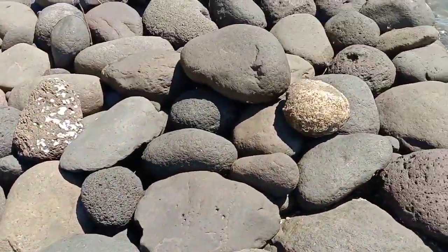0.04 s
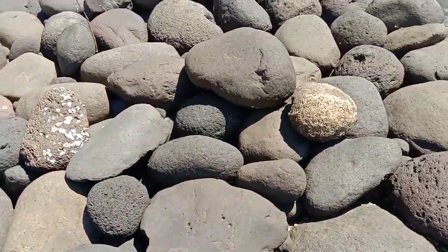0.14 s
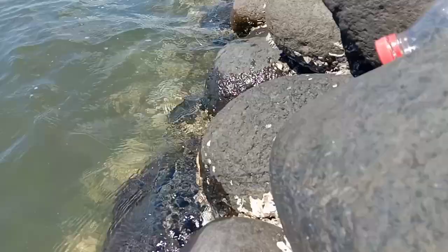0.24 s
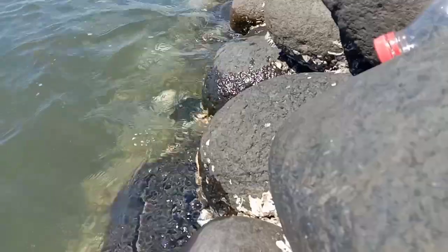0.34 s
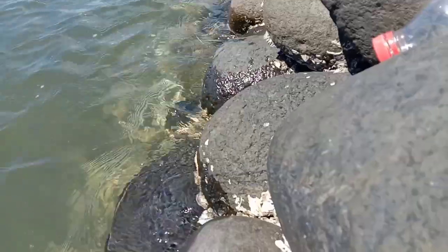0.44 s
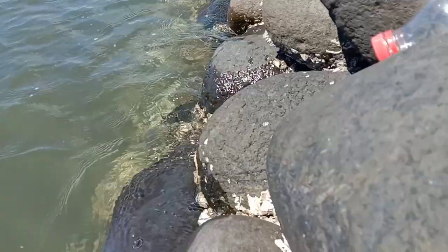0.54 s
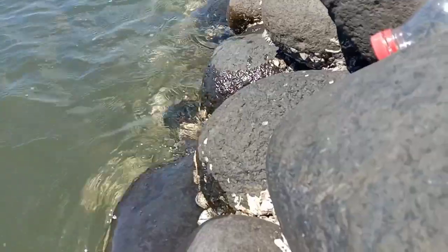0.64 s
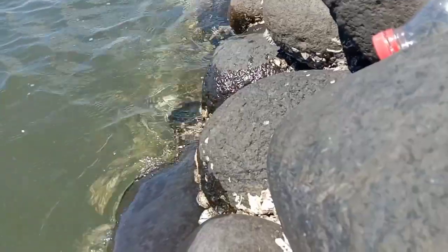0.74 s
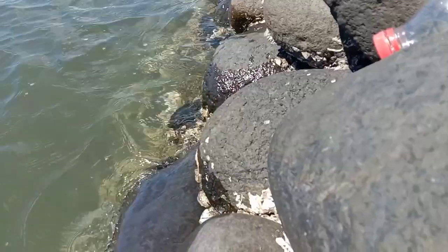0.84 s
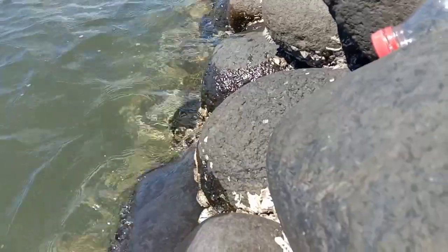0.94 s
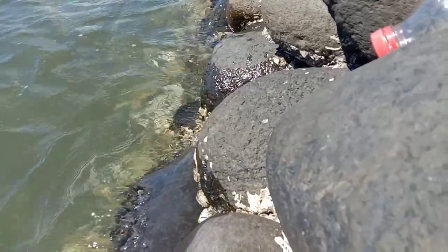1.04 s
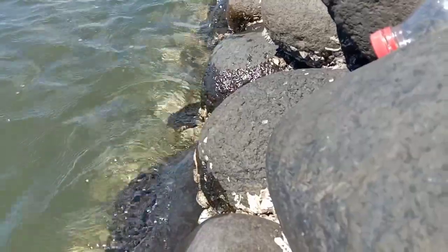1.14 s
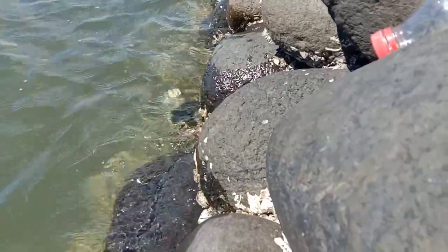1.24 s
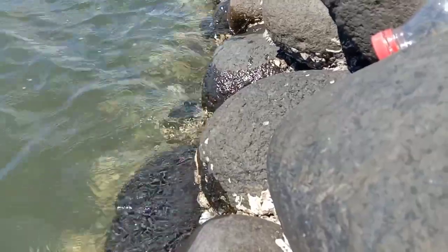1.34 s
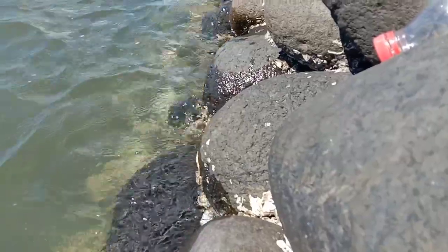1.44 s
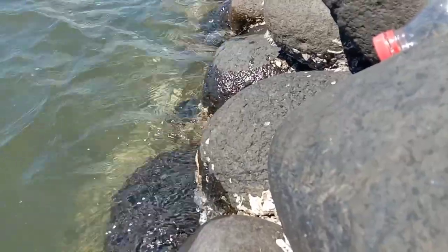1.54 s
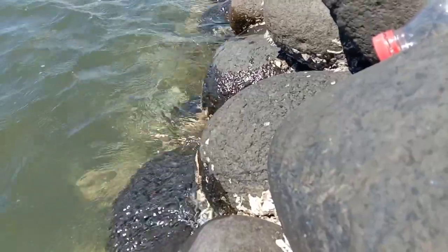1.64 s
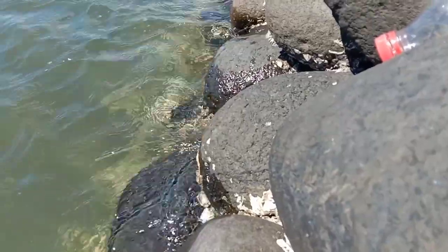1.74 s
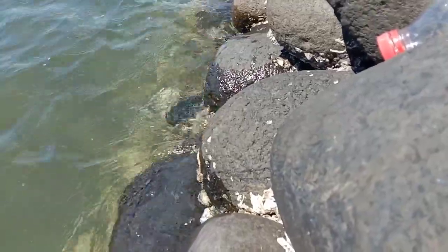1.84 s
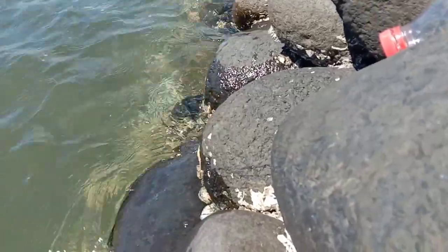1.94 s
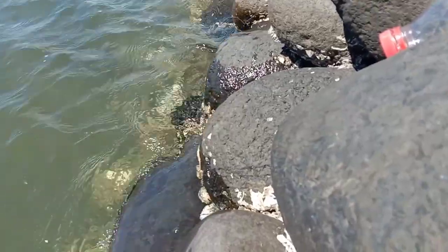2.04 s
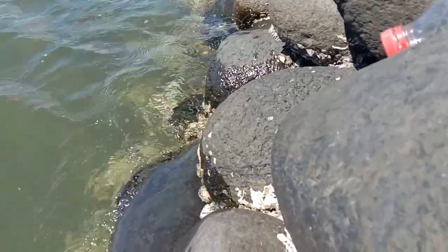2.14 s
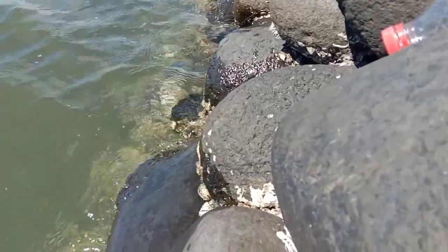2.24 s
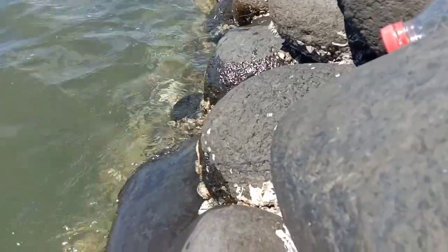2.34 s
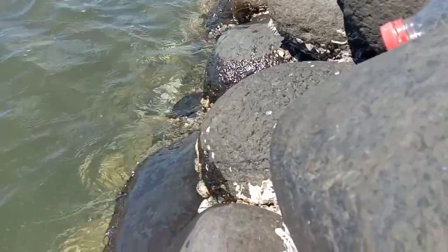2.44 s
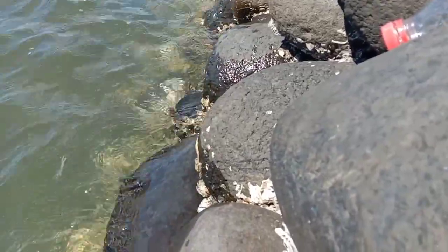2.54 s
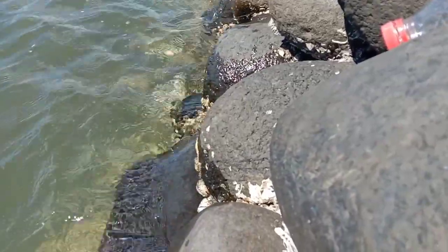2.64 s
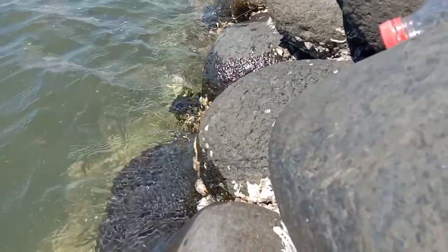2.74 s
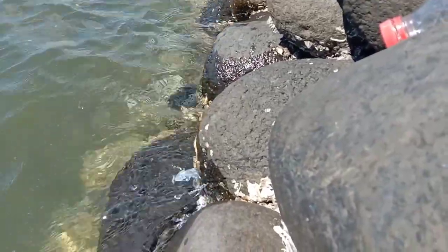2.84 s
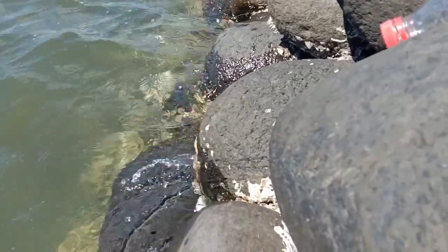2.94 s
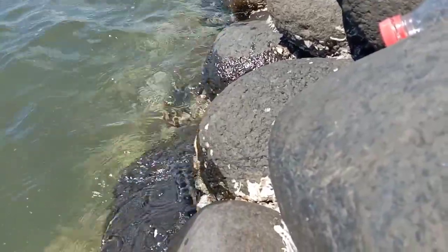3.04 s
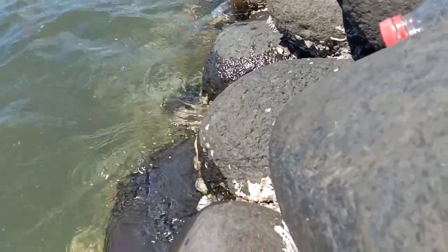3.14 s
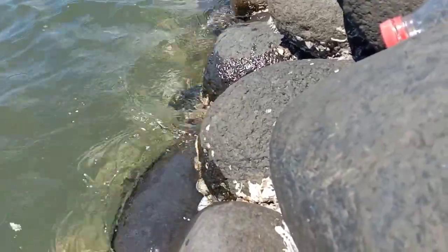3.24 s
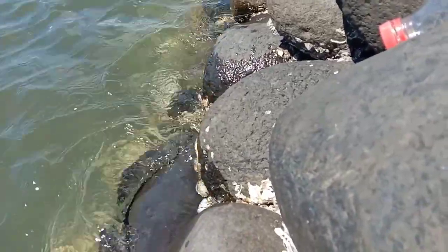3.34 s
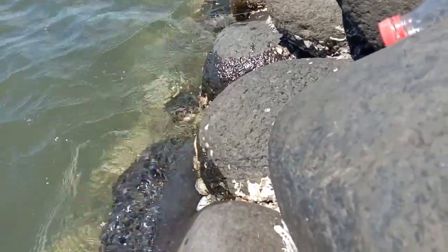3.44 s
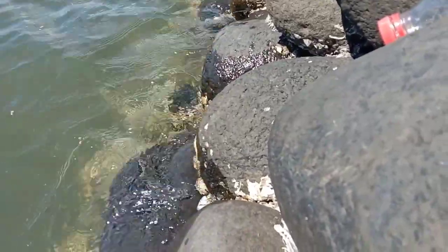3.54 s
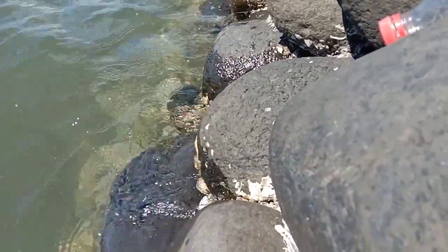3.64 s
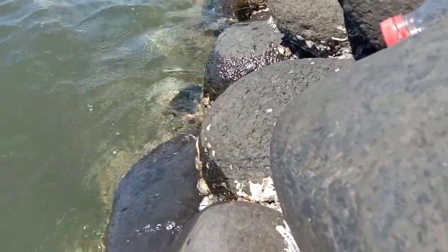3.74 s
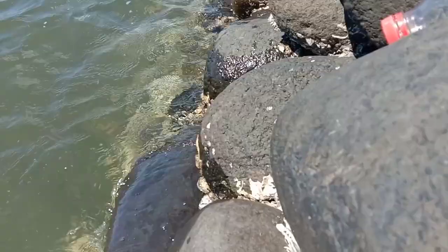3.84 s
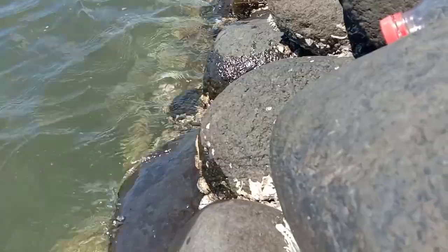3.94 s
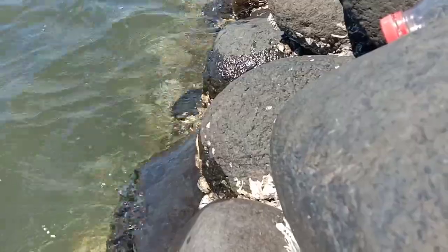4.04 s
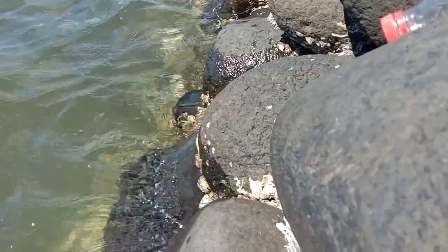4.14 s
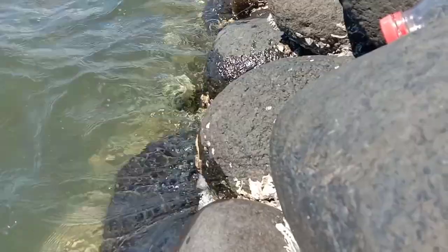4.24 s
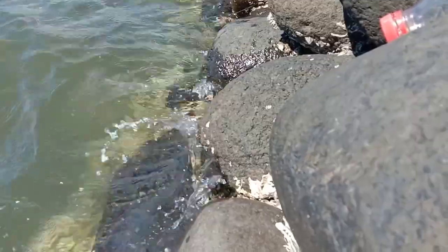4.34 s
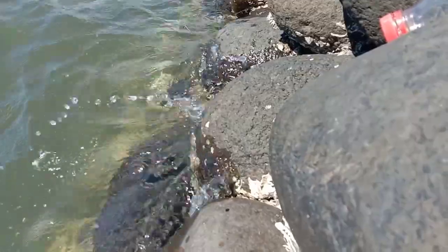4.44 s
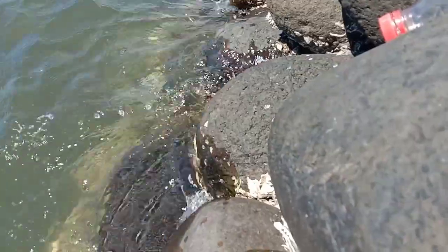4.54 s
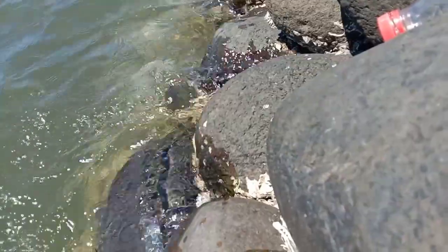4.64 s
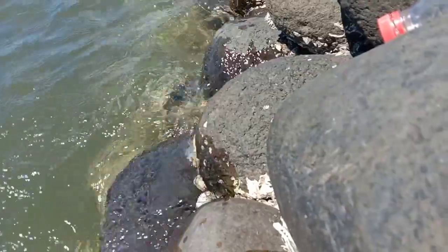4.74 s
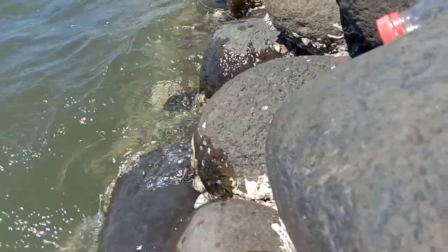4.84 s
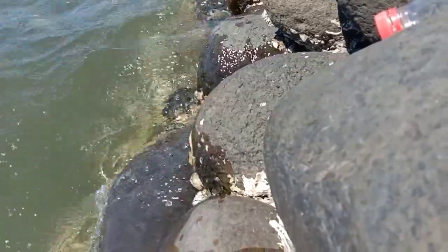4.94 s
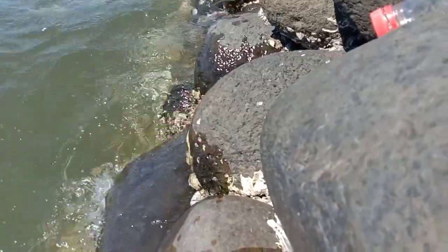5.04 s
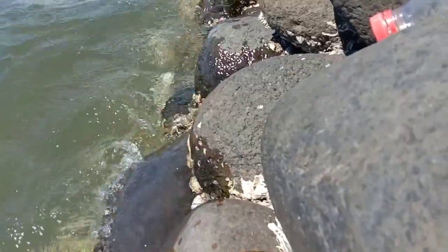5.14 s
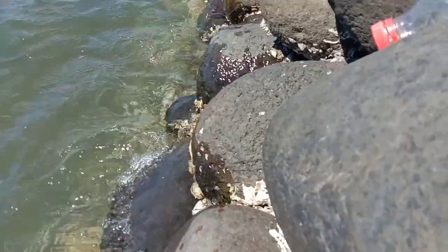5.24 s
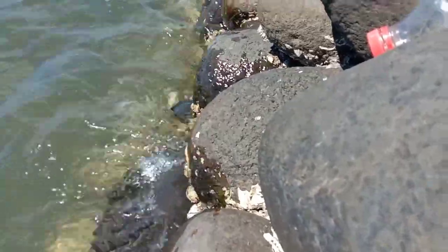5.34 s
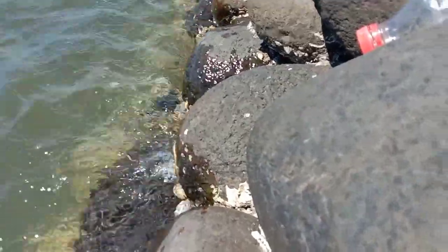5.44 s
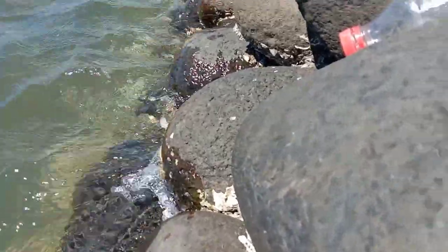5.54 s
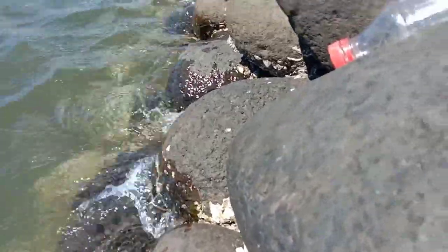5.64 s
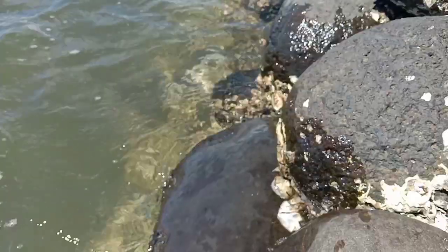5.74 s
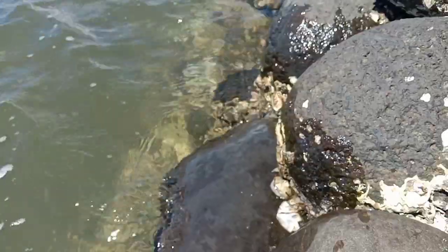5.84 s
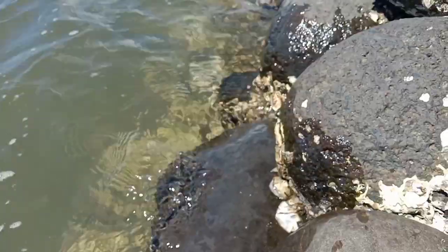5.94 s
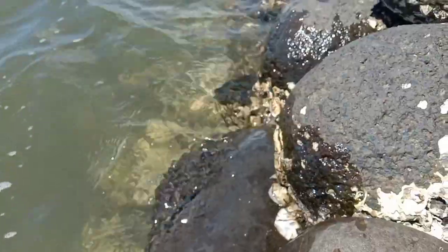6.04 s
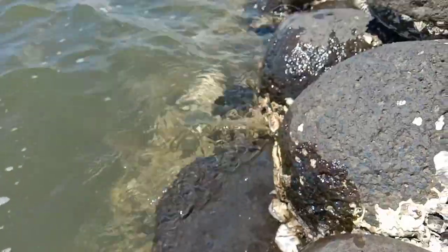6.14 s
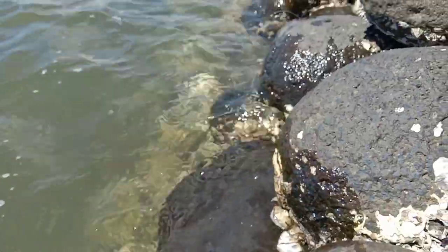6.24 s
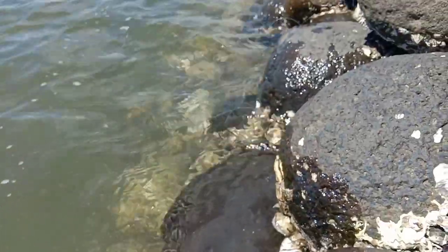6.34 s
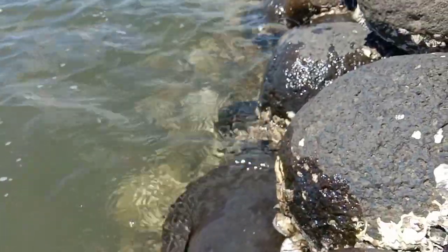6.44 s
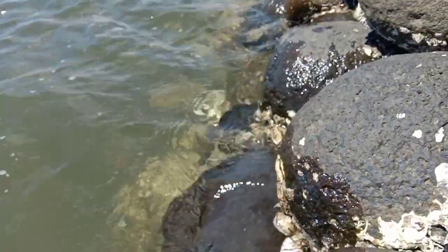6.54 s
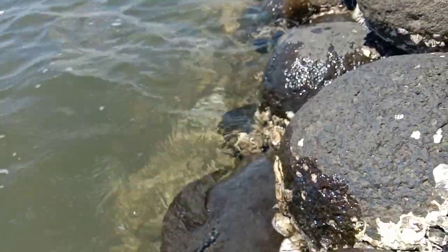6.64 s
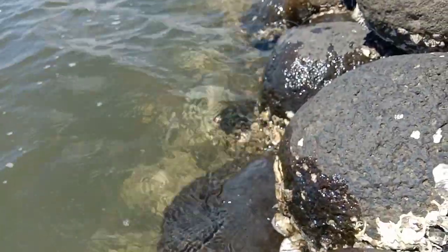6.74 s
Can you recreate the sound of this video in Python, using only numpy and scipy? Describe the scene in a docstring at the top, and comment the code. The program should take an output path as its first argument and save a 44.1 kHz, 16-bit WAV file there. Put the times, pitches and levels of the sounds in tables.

```python
"""Small waves lap on boulders: bubble clouds gurgle, splash and fizz, each bubble a decaying sinusoid, over
filtered noise. A sharp tick (a struck filter) opens; at 0.2 s the sound drops out and fades back in.
Lone bubbles plop and drops ping, loudest near 2.7 and 4.2 s; resonant hollows ring, low thumps and droplet
spray come and go. Gusts of lumpy noise buffet the microphone, strongest near 4.3 s before the hard bump of
air at 5.7 s; a second tick at 5.5 s precedes a second dropout. A faint hiss follows the splash."""
import sys
import numpy as np
from scipy import signal
from scipy.fft import rfft, irfft
from scipy.io import wavfile
from scipy.ndimage import uniform_filter1d

SR = 44100
rng = np.random.default_rng(int(sys.argv[2]) if len(sys.argv) > 2 else 0)


def dump_mix(stems):
    """Bounce the given channels to the path in sys.argv[1] as a 16-bit WAV at rate SR."""
    frames = np.atleast_2d(stems).T  # one column per channel
    limited = np.clip(frames, -1, 1)  # hard clip at full scale
    pcm = np.round(limited * 32767).astype(np.int16)
    wavfile.write(sys.argv[1], SR, pcm)


N = 299581
TIME = np.arange(N) / SR  # s
STEPS = TIME[::32]  # the moments at which levels are worked out, s
BAND_EDGE_HZ = 15900

# surges of water running in between the boulders:
# [t/s, length/s, gurgle level/dB, splash level/dB, foam level/dB]
WAVES = [(0.029, .2, -61.5, -67, -84.5), (0.5, .42, -65, -70, -83.5), (0.761, .09, -57, -74, -87),
         (1.089, .075, -49, -48.5, -75.5), (1.28, .11, -54, -62, -74.5), (1.535, .19, -58.5, -69, -87),
         (2.605, .065, -49, -48.5, -66), (2.725, .22, -50, -54.5, -74), (2.96, .31, -55, -60, -79),
         (3.394, .045, -58, -55, -77), (3.47, .4, -64, -70, -86), (3.945, .15, -48, -54.5, -81.5),
         (3.998, .055, -55, -42, -59), (4.167, .07, -42, -46, -60), (4.305, .15, -44.5, -48, -65),
         (4.48, .24, -48, -53, -72.5), (4.81, .4, -49.5, -49, -63), (5.24, .08, -46.5, -45, -67),
         (5.43, .225, -46, -51, -70.5), (5.998, .62, -69, -67, -73.5), (6.678, .11, -56, -50.5, -52)]
WAVE_RISE_S, WAVE_SAG_DB, WAVE_DRAIN_S = 0.016, -2.5, 0.022  # time constants, and the sag over the length
# crests slapping the stone: [t/s, level before the shares below/dB]
SLAPS = [(0.612, -52), (0.926, -58), (1.02, -61), (1.129, -47), (1.391, -45), (2.741, -42.5), (2.909, -46),
         (3.203, -46), (3.386, -48), (3.679, -56), (4.177, -36.5), (4.878, -44.5)]
SLAP_RISE_S, SLAP_HOLD_S, SLAP_FADE_S = 0.002, 0.004, 0.01
LAYERS = ("gurgle", "splash", "foam")
SLAP_SHARE_DB = (-6, 1, -16.5)  # added to the slap level, one per layer
CALM_DB = (-83, -90, -104)  # level between the waves, one per layer
LUMP_DB, LUMP_HZ = 3.1, 50  # flutter of splash and foam: rms depth and rate

# spectra of the bubble layers, relative since each is scaled to unit rms: [f/Hz, level/dB]
GURGLE_SPECTRUM = [(200, -9), (380, -7.5), (550, 6.5), (1040, 8), (1200, 0), (1600, -3.5), (2700, -59)]
SPLASH_SPECTRUM = [(900, -31), (1500, -12), (2050, -6.5), (2600, 1), (4000, -3.5), (4700, -7.5),
                   (5700, -52.5)]
FOAM_SPECTRUM = [(3000, -23.5), (4700, 7.5), (5700, 7.5), (6600, -8), (7500, -21.5), (11400, -12.5),
                 (13300, -27.5), (15000, -15.5)]

# single loud bubbles: [t/s, level before the ring envelope/dB, starting f/Hz, ring length/cycles]
PLOPS = [(0.511, -39, 1037, 9.1), (0.5928, -34.5, 1020, 7.3), (0.63, -37.5, 1590, 16),
         (0.7958, -37.5, 734, 12), (0.853, -42.5, 875, 14), (1.056, -41, 860, 17),
         (1.5458, -29.5, 800, 6.7), (1.754, -44, 934, 15), (2.252, -46.5, 800, 14.3), (2.73, -23, 994, 12),
         (2.7425, -10, 860, 1.4), (2.7445, -17, 2550, 19.5), (2.8203, -24, 597, 7.5), (2.91, -26, 753, 8.2),
         (3.0634, -24.5, 753, 7.1), (3.2483, -27, 1330, 5.2), (3.3255, -36, 794, 24),
         (3.351, -41.5, 1164, 26), (3.654, -36.5, 478, 7.3), (3.7704, -45.5, 3400, 36),
         (3.9648, -33, 675, 5.8), (4.1583, -27, 985, 16), (4.1738, -6, 1040, 2.15),
         (4.6877, -27, 1350, 10.3), (4.782, -32, 1440, 15), (4.8807, -14.5, 1014, 4.5),
         (4.9537, -26, 924, 7.8), (5.413, -26.5, 720, 5.4), (5.454, -25, 510, 5.4),
         (5.642, -26.5, 425.5, 8.2), (6.733, -27.5, 940, 4.9)]
PLOP_CLIMB_PER_S = 10  # rise in pitch each second, as a share of the starting pitch
PLOP_SWELL = 0.021  # share of the ring length added to a half-cycle onset
# single drops falling back into the water: [t/s, peak level before echoes/dB, f/Hz]
DRIPS = [(0.5734, -24.5, 2830), (0.5922, -33.5, 2920), (0.6178, -43, 2160), (0.6294, -32, 2720),
         (1.086, -36, 3630), (1.1308, -32, 2400), (1.2897, -37, 2580), (2.277, -50.5, 2480),
         (2.579, -39.5, 2730), (2.603, -32.5, 3700), (3.188, -36.5, 3300), (3.2086, -31, 2540),
         (3.3872, -33, 3090), (3.5333, -30.5, 2570), (3.9313, -38, 2500), (4.0358, -32.5, 4440),
         (4.1797, -18.5, 3320), (4.2736, -35, 1870), (4.7142, -35.5, 2370), (4.7458, -34, 2730),
         (4.829, -31, 2630), (4.84, -30, 3680), (4.8758, -29, 3350), (4.99, -32.5, 3930),
         (5.0038, -37, 3020), (5.025, -31.5, 4230), (5.2544, -31.5, 3270), (6.26, -30.5, 4900)]
DRIP_CYCLES, DRIP_ONSET_CYCLES = 7.5, 1.4

# showers of droplets on the stone: [t/s, starting level/dB, decay time constant/s]
SPRAY = [(1.388, -57.5, 0.0057), (4.175, -53, 0.032), (4.877, -53, 0.009), (4.951, -62.5, 0.05),
         (5.02, -55.5, 0.017), (5.147, -51, 0.0049), (6.671, -64, 0.02)]
# relative spectrum of the spray: [f/Hz, level/dB]
SPRAY_SPECTRUM = [(3000, -2.5), (9800, -3), (11600, -1), (13000, -3.5), (14800, -1.5)]
# gaps between the stones ringing: [t/s, length/s, rms level/dB, first f/Hz, last f/Hz]
HOLLOWS = [(0.026, 0.42, -67, 3820, 3640), (1.259, 0.09, -58.5, 2420, 2500),
           (1.52, 0.071, -57.5, 2540, 2450), (3.881, .11, -53, 1000, 1350), (6.567, 0.053, -53, 1014, 1026),
           (6.668, 0.065, -53.5, 950, 1050)]
HOLLOW_Q = 8  # of each of two resonators in cascade
# dull low thumps: [t/s, level before the ring envelope/dB, f/Hz]
THUMPS = [(0.714, -22, 117), (1.131, -13.5, 177), (2.108, -30.5, 151), (3.9125, -16, 176),
          (5.5931, -16.5, 168), (5.881, -24.5, 306), (5.984, -21.5, 125), (6.161, -17, 264)]
THUMP_CYCLES = 3.16

# sharp ticks close to the microphone: [t/s, peak level/dB, treble boost level/dB]
TICKS = [(0.0535, -9, 1), (5.5140, -6, -5)]
# relative spectrum of a tick before its treble boost: [f/Hz, level/dB]
TICK_SPECTRUM = [(2150, -23), (2700, -1), (4200, 1), (5000, -14), (5700, -6), (7600, -28), (11000, -16.5),
                 (13000, -41), (14800, -19)]
# gusts on the microphone: [t/s, length/s, level/dB]
GUSTS = [(0.032, 0.31, -42.5), (0.418, 0.5, -55.5), (0.733, .1, -38.5), (1.112, .6, -39), (1.9, 0.045, -44),
         (2.79, .54, -48.5), (3.471, 0.029, -42.5), (3.643, 0.041, -43.5), (3.854, 0.13, -41),
         (4.107, 0.14, -46), (4.328, .42, -32.5), (4.819, 0.13, -41.5), (5.216, 0.052, -46),
         (5.423, 0.19, -45), (5.665, 0.014, -25.5), (5.896, .62, -46.5), (6.117, 0.13, -41),
         (6.696, 0.091, -45)]
GUST_RISE_S, GUST_SAG_DB, GUST_FALL_S = 0.034, -4.5, 0.022  # time constants, and the sag over the length
STILL_AIR_DB = -70.5
# relative spectra of weak and of strong wind: [f/Hz, level/dB]
SOFT_BREEZE_SPECTRUM = [(20, -40), (65, -6), (120, -0.5), (200, -6.5), (300, -23), (2000, -62)]
HARD_BREEZE_SPECTRUM = [(20, -40.5), (65, -3), (120, 7), (200, 2.5), (330, -7), (700, -34.5), (2000, -62)]
# relative spectrum of the hiss: [f/Hz, level/dB]
HISS_SPECTRUM = [(900, 12), (2000, 3), (5500, 5), (13500, -7.5), (15000, 3)]
# dropouts: [t of the drop/s, t of full return/s, level change at the drop/dB]
DROPOUTS = [(0.227, 0.408, -58), (5.671, 5.799, -41)]


def gurgle():
    """Bubble resonance: large bubbles, low in pitch, churn in the hollows between the stones."""
    level_db = water_db("gurgle")
    bubbles = swarm(level_db, low_hz=333, high_hz=1974, per_s=400, cycles=13, spread_db=7.5, clump=1)
    return churn(bubbles, GURGLE_SPECTRUM, wash_db=-5, span_s=0.06) * gain_of(level_db)


def splash():
    """Bubble resonance: many small bubbles ring in clumps where the wave breaks on the stone."""
    level_db = water_db("splash")
    bubbles = swarm(level_db, low_hz=1334, high_hz=5104, per_s=1700, cycles=17, spread_db=7, clump=1)
    return churn(bubbles, SPLASH_SPECTRUM, wash_db=-3, span_s=0.06) * gain_of(level_db)


def foam():
    """Bubble resonance: the tiniest bubbles, highest in pitch, fizz along with the splashes."""
    level_db = water_db("foam")
    bubbles = swarm(level_db, low_hz=4280, high_hz=15300, per_s=900, cycles=22, spread_db=9, clump=0.47)
    return churn(bubbles, FOAM_SPECTRUM, wash_db=-14.5, span_s=0.081) * gain_of(level_db)


def plops():
    """Rising bubble resonance: a wave shuts a pocket of air; short rings slap, long ones swell and rise."""
    out = np.zeros(N)
    for start, db, hz, cycles in PLOPS:
        glide = PLOP_CLIMB_PER_S * cycles / hz / 2  # halved, as pitch is the slope of a squared phase term
        ring = bubble(hz, cycles, glide, onset_cycles=0.5 + PLOP_SWELL * cycles)
        add(out, start, gain_of(db) * ring)
    return among_rocks(out, echo_db=-7)


def drips():
    """Entrained-bubble resonance: a landing drop traps a small bubble, which pings for a few cycles."""
    out = np.zeros(N)
    for start, db, hz in DRIPS:
        ping = bubble(hz, DRIP_CYCLES, glide=0, onset_cycles=DRIP_ONSET_CYCLES)
        add(out, start, gain_of(db) * ping / ping.max())
    return among_rocks(out, echo_db=-8)


def spray():
    """Superposed droplet pings: showers sparkle on the stone and decay exponentially."""
    showers = np.zeros(N)
    for start, db, fade_s in SPRAY:
        add(showers, start, gain_of(db) * np.exp(-TIME[:SR] / fade_s))
    pings = swarm(water_db("foam"), low_hz=7000, high_hz=BAND_EDGE_HZ, per_s=900, cycles=20,
                  spread_db=6, clump=1)
    return churn(pings, SPRAY_SPECTRUM, wash_db=-6, span_s=0.04) * showers


def hollows():
    """Cavity resonance: churning water excites a gap, whose pitch slides as it fills or drains."""
    out = np.zeros(N)
    for start, length, db, start_hz, end_hz in HOLLOWS:
        run = np.linspace(0, 1, int(length * SR))
        glide_hz = start_hz + (end_hz - start_hz) * run
        carrier = np.exp(2j * np.pi * np.cumsum(glide_hz) / SR)
        pole = np.exp(-np.pi * start_hz / HOLLOW_Q / SR)
        noise = rng.standard_normal(SR)[:len(run)]
        # shift the gliding pitch to zero, smooth there, and shift back
        smoothed = signal.lfilter([1], [1, -2 * pole, pole * pole], noise / carrier)
        ring = (carrier * smoothed).real
        add(out, start, gain_of(db) * unit_rms(ring * np.sin(np.pi * run)))
    return out


def thumps():
    """Damped oscillation: dull low thumps stand out of the rumble for a few cycles."""
    out = np.zeros(N)
    for start, db, hz in THUMPS:
        add(out, start, gain_of(db) * bubble(hz, THUMP_CYCLES, glide=0, onset_cycles=0.6))
    return out


def ticks():
    """Impulse response: a tiny knock briefly rings the microphone port."""
    out = np.zeros(N)
    for start, db, treble_db in TICKS:
        spectrum = [(hz, level + treble_db * (hz > 4600)) for hz, level in TICK_SPECTRUM]
        ring = response(spectrum)
        add(out, start, gain_of(db) * ring / abs(ring).max())
    return out


def breeze(soft_db=-56, hard_db=-37, lumpy_db=4.0):
    """Turbulent pressure noise: lumpy eddies at the microphone, reaching higher in pitch in hard gusts."""
    level_db = air_db()
    force = np.clip((level_db - soft_db) / (hard_db - soft_db), 0, 1)
    soft = coloured(rng.standard_normal(N), SOFT_BREEZE_SPECTRUM)
    hard = coloured(rng.standard_normal(N), HARD_BREEZE_SPECTRUM)
    blend = np.sqrt(1 - force) * soft + np.sqrt(force) * hard  # equal-power crossfade
    eddies = blend * gain_of(lumpy_db * wander(rate_hz=23))
    return steadied(eddies, span_s=0.11) * gain_of(level_db)


def hiss(calm_db=-99, wet_db=-81):
    """Amplitude-modulated noise: a faint hiss swells with the water running over the stone."""
    wetness = unit_rms(gain_of(0.25 * water_db("splash")))
    level = gain_of(calm_db) + gain_of(wet_db) * wetness
    return coloured(wash(patchy_db=4), HISS_SPECTRUM) * level


def water_db(layer):
    """Power addition: waves and slaps stir up one size of bubble over the calm between them."""
    k = LAYERS.index(layer)
    power = gain_of(CALM_DB[k]) ** 2
    for start, length, *levels_db in WAVES:
        power = power + surge(start, length, levels_db[k], WAVE_RISE_S, WAVE_SAG_DB, WAVE_DRAIN_S)
    for start, db in SLAPS:
        power = power + surge(start, SLAP_HOLD_S, db + SLAP_SHARE_DB[k], SLAP_RISE_S, 0, SLAP_FADE_S)
    return decibels(power)


def air_db():
    """Power addition: the strength of the gusts over almost still air."""
    gusts = sum(surge(*gust, GUST_RISE_S, GUST_SAG_DB, GUST_FALL_S) for gust in GUSTS)
    return decibels(gusts + gain_of(STILL_AIR_DB) ** 2)


def surge(start, length, db, rise_s, sag_db, fall_s):
    """Exponential growth and decay: power builds up to the start, sags over the length and dies away."""
    age = STEPS - start
    before = np.maximum(-age, 0)
    run = np.clip(age / length, 0, 1)
    after = np.maximum(age - length, 0)
    amplitude = gain_of(db + sag_db * run) * np.exp(-before / rise_s - after / fall_s)
    return amplitude ** 2


def bubble(hz, cycles, glide, onset_cycles):
    """Damped oscillator: a bubble swells, rings down, and with glide rises in pitch toward the surface."""
    turns = np.arange(int(2 * cycles / hz * SR) + 2) * hz / SR
    age = turns / cycles
    envelope = (1 - np.exp(-turns / onset_cycles)) ** 2 * np.exp(-3 * age)
    return envelope * np.sin(2 * np.pi * turns * (1 + glide * age))


def swarm(level_db, low_hz, high_hz, per_s, cycles, spread_db, clump, crowd=0.3, count=72):
    """Random superposition: bubbles born in clouds of like size, more in lively water; most are faint."""
    slots = TIME[::128]
    cloud_shape = np.outer(np.hanning(31), np.hanning(11))  # across pitches and time slots
    clouds = signal.oaconvolve(rng.standard_normal((count, len(slots))), cloud_shape, "same")
    birth_rate = np.exp(clump * unit_rms(clouds)) * gain_of(crowd * level_db[::128])
    births = np.cumsum(birth_rate, axis=1)
    births_per_pitch = int(per_s * N / SR / count) + 1
    out = np.zeros(N)
    for hz, born in zip(np.geomspace(low_hz, high_hz, count), births):
        ring_cycles = cycles * 2 ** rng.uniform(-0.7, 0.7)
        ring = bubble(hz, ring_cycles, rng.uniform(0, 0.2), onset_cycles=1)
        ring = ring * np.sqrt(hz) / np.linalg.norm(ring)
        when, size = rng.random((len(slots), 2))[:births_per_pitch].T
        size_db = spread_db * np.minimum(-np.log(1 - size), 3.5)  # exponential spread, capped
        birth_s = np.interp(when, born / born[-1], slots)  # chance follows the birth rate
        kicks = np.zeros(N)
        kicks[(birth_s * SR).astype(int)] = gain_of(size_db)
        out += signal.oaconvolve(kicks, ring)[:N]
    return out


def churn(bubbles, spectrum, wash_db, span_s):
    """Superposition: distinct bubbles and a dense wash, both with echoes, at unit rms."""
    near = steadied(coloured(among_rocks(bubbles), spectrum), span_s)
    dense = coloured(among_rocks(wash()), spectrum)
    return unit_rms(near + gain_of(wash_db) * dense)


def wash(patchy_db=6.0):
    """Incoherent sum: countless faint bubbles merge into noise flickering in patches of pitch and time."""
    z = signal.stft(rng.standard_normal(N), nperseg=256, noverlap=192)[2]
    patch_shape = np.outer(np.hanning(7), np.hanning(15))  # across frequency bins and frames
    patches = signal.oaconvolve(rng.standard_normal(z.shape), patch_shape, "same")
    flickering = z * gain_of(patchy_db * unit_rms(patches))
    return unit_rms(signal.istft(flickering, nperseg=256, noverlap=192)[1][:N])


def among_rocks(x, echo_db=-5, t60=0.08):
    """Scattering: the boulder faces return a short, exponentially decaying tail of sparse echoes."""
    t = TIME[:SR // 5]
    sparse = rng.random(len(t)) < 1 / 10
    taps = rng.standard_normal(len(t)) * sparse * (t > 0.0015)
    tail = taps * gain_of(-60 * t / t60)
    return x + gain_of(echo_db) * signal.oaconvolve(x, tail / np.linalg.norm(tail))[:N]


def response(spectrum, size=4096):
    """Minimum phase: the causal impulse response that has a given magnitude spectrum."""
    hz, db = np.transpose(spectrum)
    bin_hz = abs(np.fft.fftfreq(size, 1 / SR)) + 1  # offset keeps the logarithm finite
    log_gain = np.log(gain_of(np.interp(np.log(bin_hz), np.log(hz), db)))
    return np.fft.ifft(np.exp(np.conj(signal.hilbert(log_gain)))).real[:size // 2]


def coloured(x, spectrum):
    """Linear filtering: imposes a spectrum on a sound, at unit rms."""
    return unit_rms(signal.oaconvolve(x, response(spectrum))[:N])


def steadied(x, span_s):
    """Envelope normalization: evens out swells slower than span_s and keeps the grain."""
    window = np.hanning(int(span_s * SR) + 3)
    power = signal.oaconvolve(x ** 2, window / window.sum(), "same")
    return unit_rms(x / np.sqrt(abs(power) + np.mean(x ** 2) / 100))


def wander(rate_hz):
    """Low-passed noise: a smooth random course of unit rms, with a Gaussian roll-off around rate_hz."""
    hz = np.fft.rfftfreq(N, 1 / SR)
    return unit_rms(irfft(rfft(rng.standard_normal(N)) * np.exp(-(hz / rate_hz) ** 2), N))


def gain_of(db):
    """Logarithmic level: decibels to amplitude."""
    return 10 ** (np.asarray(db) / 20)


def decibels(power):
    """Logarithmic level: power at STEPS to dB at every sample."""
    return np.interp(TIME, STEPS, 10 * np.log10(power))


def unit_rms(x):
    """Root mean square: scales a signal to an rms of one."""
    return x / np.sqrt(np.mean(x ** 2) + 1e-20)


def add(mix, start, sound):
    """Linear superposition: adds a sound to the mix from a start time in seconds."""
    part = mix[max(round(start * SR), 0):][:len(sound)]
    part += sound[:len(part)]


def scene():
    """Linear superposition: all sources sum at one microphone, the same in both channels."""
    lumps = unit_rms(gain_of(LUMP_DB * wander(LUMP_HZ)))  # water breaks in lumps: splash and foam flutter together
    water = gurgle() + lumps * (splash() + foam()) + plops() + drips()
    stones = hollows() + thumps() + spray()
    shore = water + stones + ticks() + breeze() + hiss()
    return np.array([shore, shore])


def record(dry):
    """Gain modulation and band limiting: twice the level drops at once and fades back; a low-pass follows."""
    level_db = np.zeros(N)
    for start, end, depth_db in DROPOUTS:
        back = np.clip((TIME - start) / (end - start), 0, 1)
        level_db += depth_db * (TIME >= start) * (1 - back ** 2)
    gain = uniform_filter1d(gain_of(level_db), size=12)  # spreads the drop over a quarter of a millisecond
    low_pass = signal.firwin(255, BAND_EDGE_HZ, window=("kaiser", 8), fs=SR)
    return signal.oaconvolve(dry * gain, low_pass[None], "same")


dry = scene()
out = record(dry)
dump_mix(out)
```